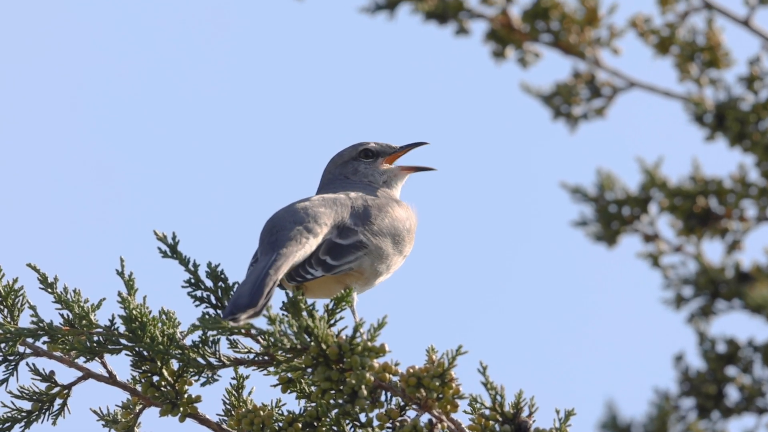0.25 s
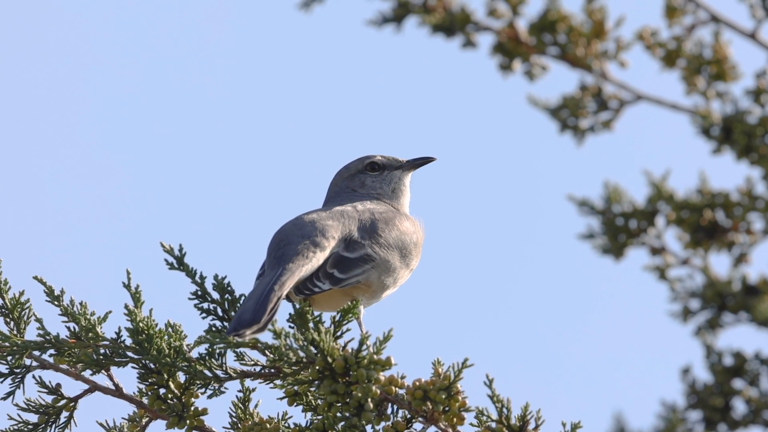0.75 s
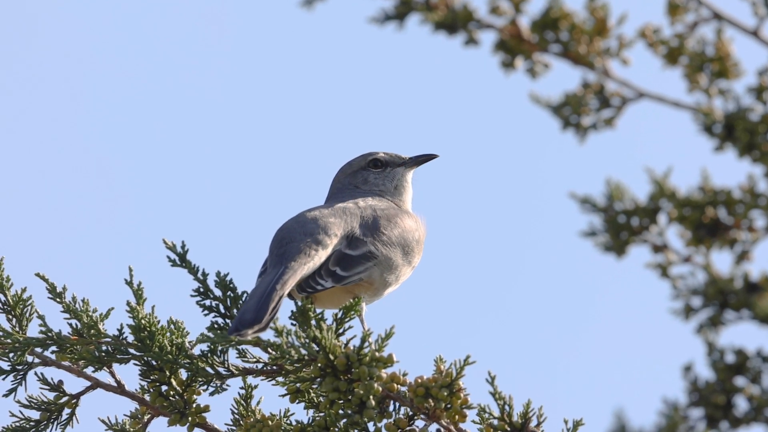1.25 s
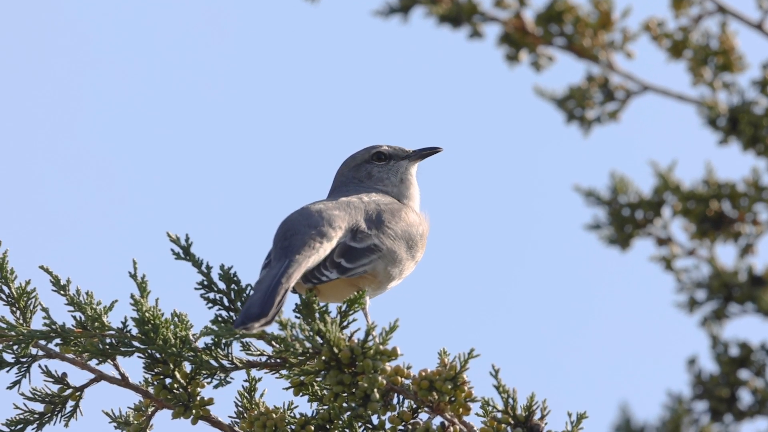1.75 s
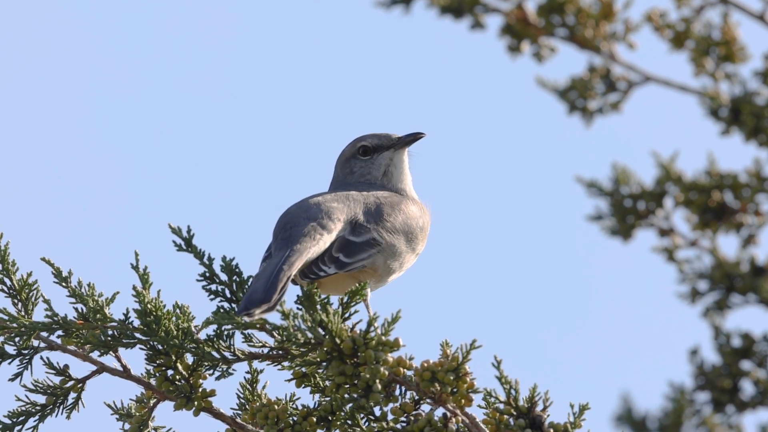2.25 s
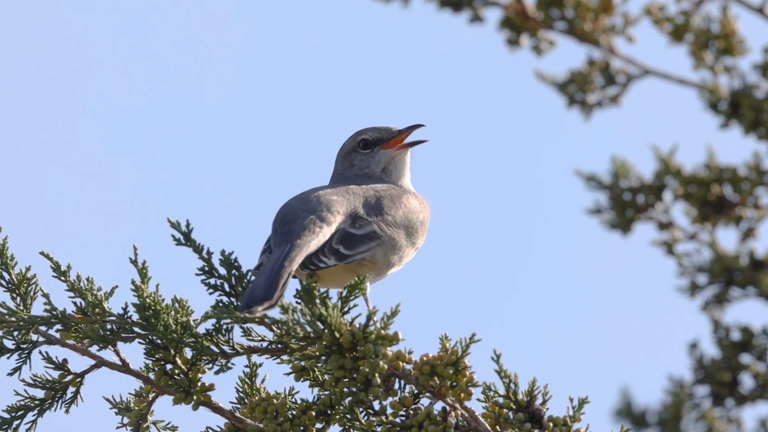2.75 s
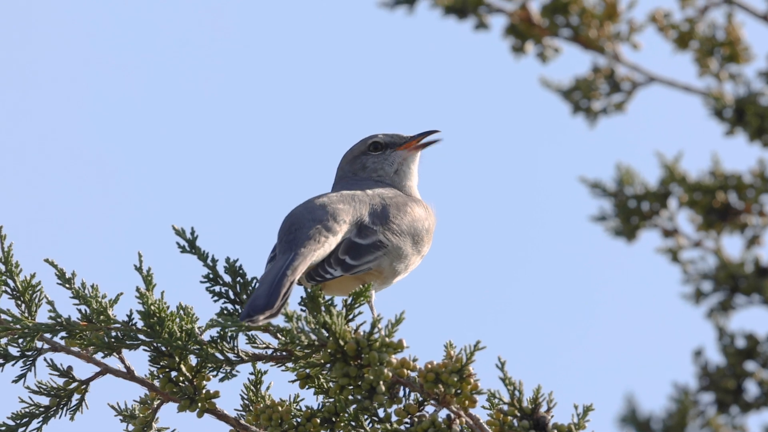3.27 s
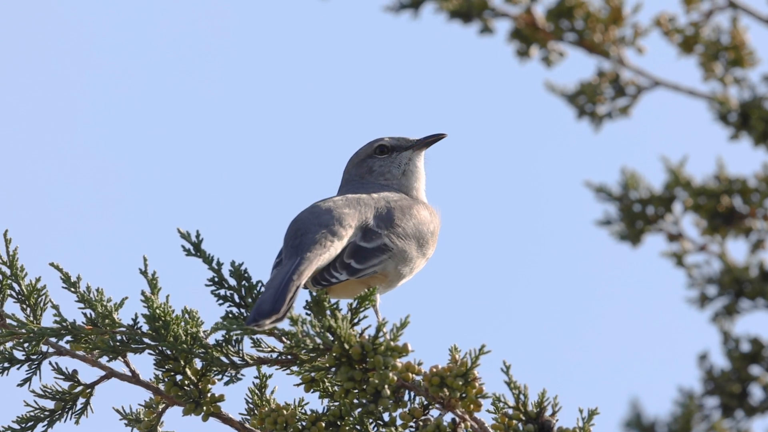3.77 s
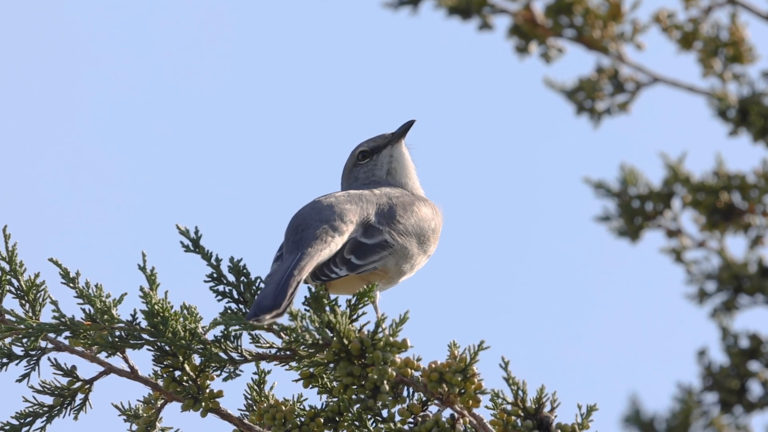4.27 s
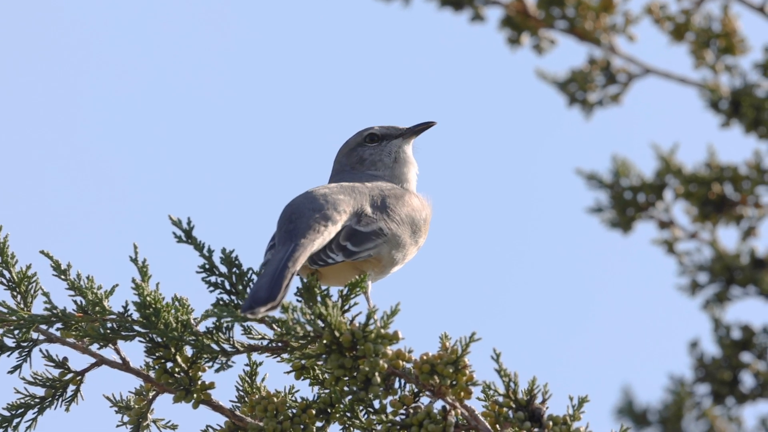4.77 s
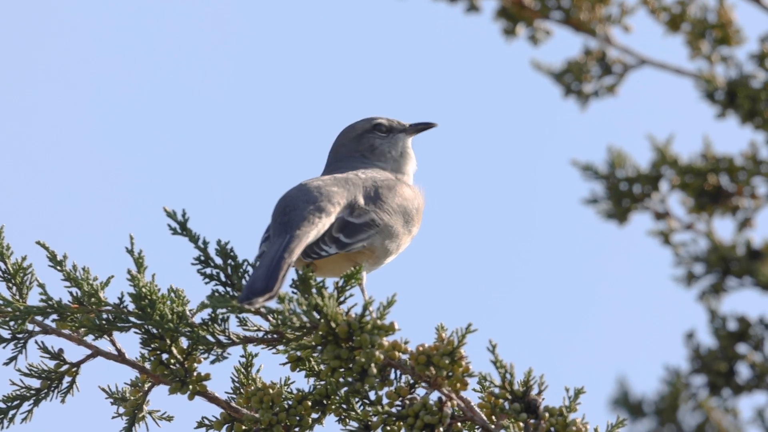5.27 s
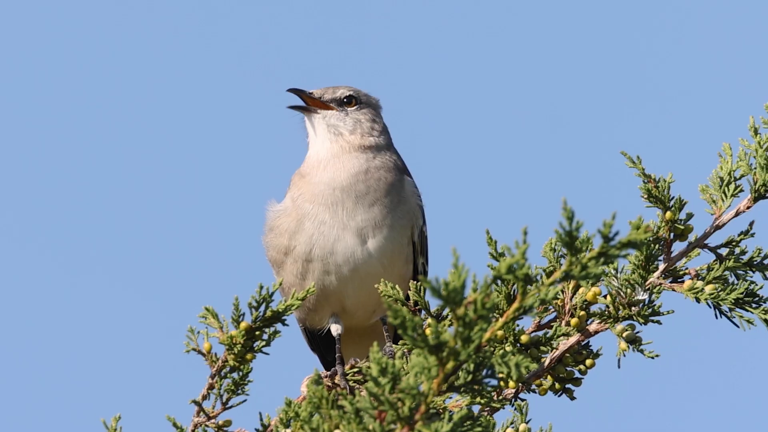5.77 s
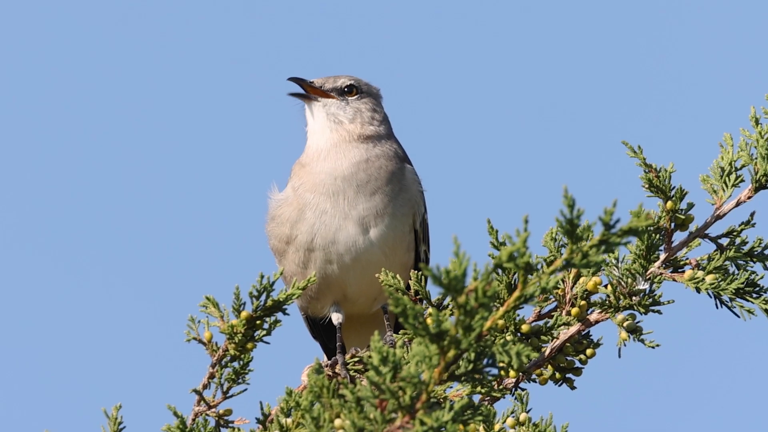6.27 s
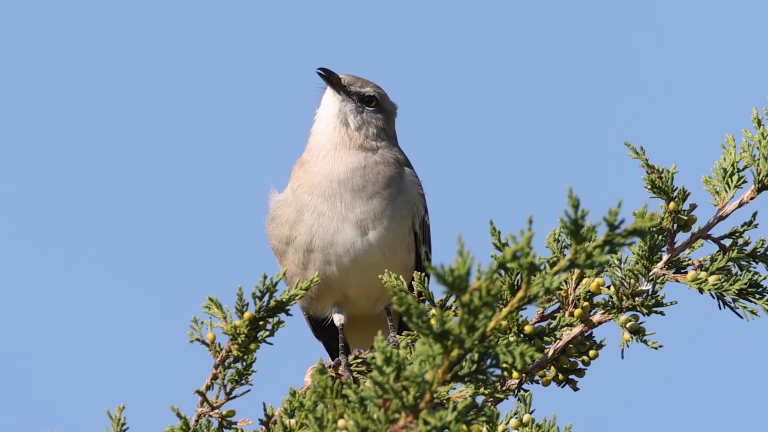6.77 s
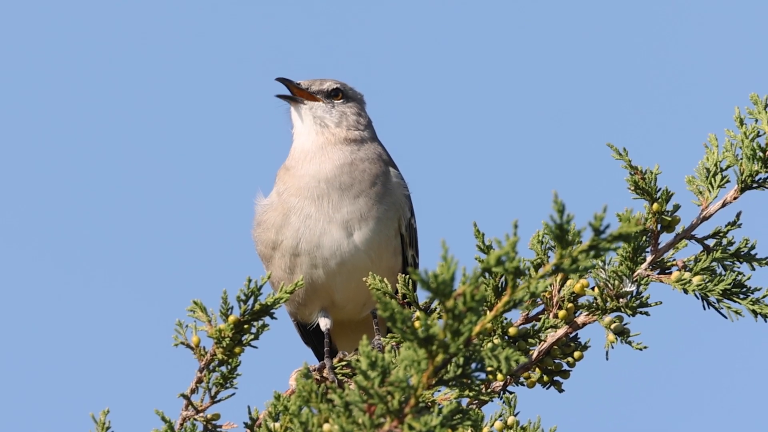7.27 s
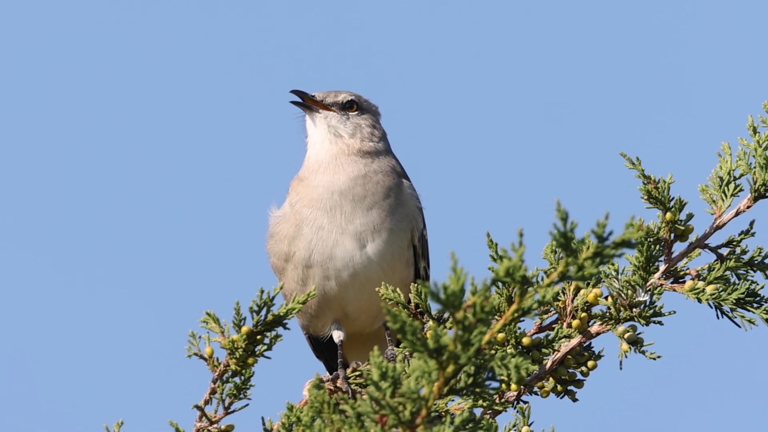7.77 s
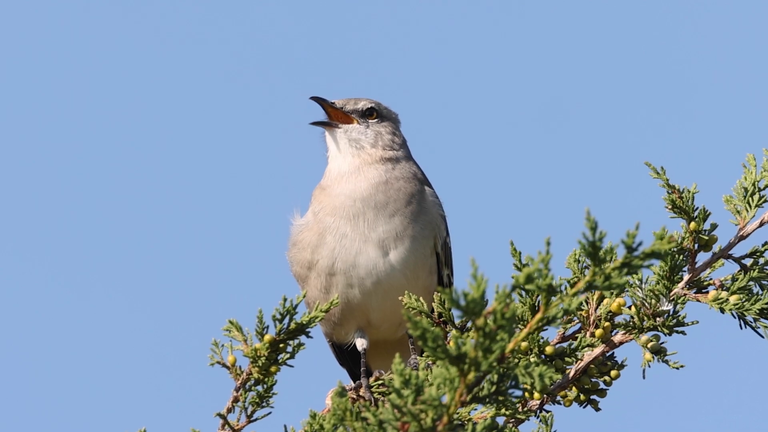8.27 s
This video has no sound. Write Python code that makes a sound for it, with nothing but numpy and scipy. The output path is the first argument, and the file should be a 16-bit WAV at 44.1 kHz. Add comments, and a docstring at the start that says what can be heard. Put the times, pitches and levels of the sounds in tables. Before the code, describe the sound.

A mockingbird sings close by outdoors: nasal calls, slurred whistles, a quick trill, raspy chips and a closing chatter over faint throbbing insects and low rumble.

```python
"""First comes a nasal, two-voiced call: a mockingbird sings close by, with two voices that modulate each other.
Slurred whistles, strained arches, a quick trill, hooks with yelps, rasps, rising chips and a chatter follow.
Its notes are near sines with chosen overtones; the rasps are shaped noise. Faint far whistles are near sines too.
Behind them, insects throb as pulsed narrow hiss, a cricket chirps, and a low rumble is filtered noise.
Part-way through, the rumble drops, the cricket stops and the insect chorus changes its balance."""
import sys
import numpy as np
from scipy import signal
from scipy.fft import rfft, irfft, next_fast_len
from scipy.io import wavfile
from scipy.ndimage import uniform_filter1d

SR = 44100
rng = np.random.default_rng(int(sys.argv[2]) if len(sys.argv) > 2 else 0)


def to_wav(s):
    """Save 16-bit WAV."""
    ch = np.atleast_2d(s).T  # columns
    pcm = np.round(np.clip(ch, -1, 1) * 32767)  # PCM
    wavfile.write(sys.argv[1], SR, pcm.astype(np.int16))


N = 375732
TIME = np.arange(N) / SR   # seconds
PROGRESS = np.linspace(0, 1, 101)   # from the start of a note to its end


def from_db(db):
    """Turn decibels into a plain gain."""
    return 10 ** (np.asarray(db) / 20)


def rms_one(x):
    """Scale a signal to an rms level of 1."""
    return x / np.sqrt(np.mean(np.abs(x) ** 2) + 1e-20)


def turns(hz):
    """Add up a changing frequency into a phase in radians."""
    return 2 * np.pi * np.cumsum(hz) / SR


def gain_at(spectrum, hz):
    """Gain of a (Hz, dB) table, joined on a log-frequency axis."""
    points_hz, db = np.transpose(spectrum)
    return from_db(np.interp(np.log(hz + 1), np.log(points_hz), db))


def coloured_noise(spectrum):
    """Noise with the given spectrum, rms 1."""
    size = next_fast_len(N)
    white = rfft(rng.standard_normal(size))
    gain = gain_at(spectrum, np.fft.rfftfreq(size, 1 / SR))
    return rms_one(irfft(white * gain, size)[:N])


def wander(rate_hz):
    """Random motion up to about the given rate, rms 1."""
    lowpass = signal.butter(2, rate_hz, fs=SR, output="sos")
    settled = signal.sosfilt(lowpass, rng.standard_normal(N + SR))[SR:]
    return rms_one(settled)


def stretches(rows):
    """A control that takes each row's value from its start to its end, with soft edges."""
    steps = sum(value * ((TIME > start) & (TIME < end)) for start, end, value in rows)
    return uniform_filter1d(steps * 1., SR // 100)


def hump(top_at, rise, fall, flatness):
    """Over a note: climbs by rise to zero at top_at, then sinks by fall; flatness 1 is a point, 2 a dome."""
    top_at = np.clip(top_at, .02, .98)
    away = np.interp(PROGRESS, [0, top_at, 1], [1, 0, 1])
    return -np.where(PROGRESS < top_at, rise, fall) * away ** flatness


def gesture(start, length, hz, db):
    """One note as rows of (seconds, Hz, dB)."""
    return np.transpose(np.broadcast_arrays(start + length * PROGRESS, hz, db))


def arched_notes(rows, rise, fall, edge_db, flatness, level_flatness, loud_lag=0):
    """Pitch and loudness each rise and fall with the air pressure; loudness may peak later."""
    arches = []
    for start, length, top_hz, top_at, peak_db in rows:
        hz = top_hz * (1 + hump(top_at, rise, fall, flatness))
        db = peak_db + hump(top_at + loud_lag, edge_db, edge_db, level_flatness)
        arches.append(gesture(start, length, hz, db))
    return arches


def notes(table, bend_hz, shake):
    """Yield each note's samples, pitch, loudness and phase; shake jolts both loudness and phase."""
    for note in table:
        s, hz, db = np.transpose(note)
        at = np.flatnonzero((TIME >= s.min() - .002) & (TIME <= s.max() + .002))
        fade = np.clip(np.minimum(at - at[0], at[-1] - at) / (.003 * SR), 0, 1)
        pitch = np.interp(TIME[at], s, hz) + bend_hz[at]
        loudness = np.interp(TIME[at], s, from_db(db)) * np.sin(fade * np.pi / 2) ** 2
        yield at, pitch, loudness * (1 + shake[at].real), turns(pitch) + shake[at].imag


def tones(table, partials, bend_hz, shake):
    """A voice sings a main tone with weaker partials tied to its pitch."""
    out = np.zeros(N)
    for at, pitch, loudness, phase in notes(table, bend_hz, shake):
        wave = sum(from_db(db) * np.sin(multiple * phase) for multiple, db in partials)
        out[at] += loudness * wave
    return out


# Rough stretches, where the bird's voice organ (the syrinx) vibrates irregularly.
# Each row: start in seconds, end in seconds, roughness from 0 to 1.
ROUGH_STRETCHES = [(1.09, 1.15, .14), (1.525, 1.56, .4), (2.515, 2.56, 0.22), (2.95, 3.09, 0.29),
                   (3.39, 3.425, 0.3), (3.6, 3.76, 0.14), (4.135, 4.28, 0.32), (6.1, 6.21, 0.34),
                   (8.13, 8.21, 0.27), (8.37, 8.52, .3)]
# Fast pitch warbles. Each row: start in seconds, end in seconds, depth in Hz.
PITCH_WARBLES = [(1.99, 2.19, 45), (2.52, 2.59, 80), (3.735, 3.81, 148)]
# Tone mixes. Each row: multiple of the note's pitch, gain in dB.
# The arches repeat at a quarter of the main pitch, so their multiples go in quarters.
ARCH_MIX = [(1 / 2, -11.5), (3 / 4, -15.5), (1, 0), (5 / 4, -18.5), (3 / 2, -19.5), (5 / 2, -33),
            (7 / 2, -41)]
WHISTLE_MIX = [(1, 1), (2, -32)]
CHIP_MIX = [(1, 7), (2, -19), (3, -26)]


def mockingbird():
    """All note types share one unsteady syrinx, so they share its bends, jolts and roughness."""
    warble_hz = 80
    bend_hz = stretches(PITCH_WARBLES) * np.sin(2 * np.pi * warble_hz * TIME) + 22 * wander(110)
    # the real part shakes loudness, the imaginary part shakes phase
    jolts = (wander(680) + 1j * wander(470)) / np.sqrt(2)
    roughness = stretches(ROUGH_STRETCHES)
    shake = roughness * jolts + .16 * wander(61)
    # strained arches break into beads, some fifty a second, that rise and fall in pitch and loudness
    beads = roughness * np.sin(turns(52 + 16 * wander(30)))

    nasal = nasal_calls(bend_hz, shake + .22 * jolts, slip_hz=60, coupling_db=-4)
    arches = tones(arch_notes(), ARCH_MIX, bend_hz + 330 * beads, shake + 1.2 * beads + .13 * jolts)
    whistle_notes = [*slur_notes(), buzz_note(), *hook_notes(), *yelp_notes()]
    whistles = tones(whistle_notes, WHISTLE_MIX, bend_hz, .7 * shake + .04 * jolts)
    trill = tones(trill_notes(half_s=.008, fall_hz=287), WHISTLE_MIX, bend_hz, shake + .23 * jolts)
    chips = tones(chip_notes(), CHIP_MIX, bend_hz, shake + .39 * jolts)
    return nasal + arches + whistles + trill + chips + rasps(grain=.067, swell_db=3)


# How the throat and open beak colour the overtones of nasal calls. Each row: frequency in Hz, gain in dB.
THROAT_COLOUR = [(1500, -8), (3200, 3.5), (4000, 6.5), (5750, -0.5), (6500, -21), (9000, -18), (10500, -45),
                 (13000, -25), (16000, -54)]


def nasal_calls(bend_hz, shake, slip_hz, coupling_db):
    """The second side sings about a fifth below the first; the two modulate each other into a stack of lines."""
    out = np.zeros(N)
    slip = turns(slip_hz * wander(12))   # the second side drifts against the first
    for at, pitch, loudness, phase in notes(nasal_notes(), bend_hz, shake):
        # overtones bloom as the beak opens, and the voice gets purer at the top of its range
        opening = np.sqrt(np.abs(np.sin(np.linspace(0, np.pi, len(at)))))
        bloom = opening * np.minimum(2450 / pitch, 1) ** 2
        # in brief notes the beak stays half shut, which lowers the throat's resonances
        shut = 1 + .16 * max(1 - len(at) / SR / .14, 0)
        for k in range(2, 20):
            multiple = k / 3
            second_order = -k % 3   # how strongly this line follows the second side's drift
            hz = multiple * pitch
            gain = 1
            if multiple != 1:
                coupling = from_db(coupling_db * second_order)
                gain = bloom * gain_at(THROAT_COLOUR, hz * shut) * coupling * (hz < SR / 2)
            dispersion = k * k   # the throat delays each line differently
            out[at] += loudness * gain * np.sin(multiple * phase + second_order * slip[at] + dispersion)
    return out


# Nasal calls. Each row: start in seconds, length in seconds, top pitch in Hz,
# place of the top from 0 to 1, peak level of the main tone in dB before the shaking.
CALLS = [(0.0, .052, 2100, .25, -31.5), (0.272, .192, 2430, .43, -30.3), (0.612, .138, 2400, .43, -30),
         (0.985, .163, 2150, .3, -32), (4.246, .04, 2700, .1, -26), (7.938, .044, 2600, .5, -34.5)]
# Closing chatter. Each row: start in seconds, length in seconds, top pitch in Hz,
# peak level of the main tone in dB before the shaking.
CHATTER_NOTES = [(8.299, .036, 3200, -24.5), (8.345, .034, 3330, -21.5), (8.396, .028, 2850, -27),
                 (8.443, .028, 3050, -25), (8.489, .033, 2880, -25.5)]


def nasal_notes():
    """Air pressure makes broad pitch arches for the calls, short steep ones for the chatter."""
    # rise, fall and loud_lag are shares: of the top pitch, and of the note's length
    calls = arched_notes(CALLS, rise=.16, fall=.28, edge_db=7, flatness=1.9, level_flatness=4, loud_lag=.3)
    top_at = .42
    chatter = [(start, length, hz, top_at, db) for start, length, hz, db in CHATTER_NOTES]
    return calls + arched_notes(chatter, rise=.34, fall=.34, edge_db=11, flatness=1.3, level_flatness=1.6)


# Three long strained arches, each a list of points.
# Each row: time in seconds, pitch of the main tone in Hz, rms level of the main tone in dB before the shaking.
STRAINED_ARCHES = [
    [(2.845, 2541, -34), (2.861, 3120, -26), (2.881, 2837, -25), (2.899, 3258, -24), (2.977, 3400, -29),
     (3.007, 3118, -26), (3.017, 3345, -28), (3.049, 3425, -30), (3.08, 3226, -34)],
    [(3.402, 3008, -35), (3.418, 3067, -25), (3.47, 3491, -28), (3.49, 3580, -29), (3.6, 3315, -26),
     (3.69, 2743, -28), (3.716, 2952, -30), (3.73, 2940, -32)],
    [(4.005, 2345, -34), (4.023, 3161, -29), (4.079, 3515, -26), (4.131, 3516, -29), (4.139, 3150, -25),
     (4.155, 3343, -27), (4.169, 3036, -30), (4.211, 3745, -22), (4.215, 3633, -28)],
]
# Soft arches, one between the chips and one after them, before the chatter.
# Each row: start in seconds, length in seconds, top pitch in Hz,
# place of the top from 0 to 1, peak level of the main tone in dB before the shaking.
SOFT_ARCH_NOTES = [(6.1, .105, 3350, .44, -38), (8.135, .072, 3350, .26, -39.5)]


def arch_notes():
    """The long strained arches follow drawn pitch curves; the soft ones are simple humps."""
    crest_db = 2.5   # peak over rms
    strained = [np.array(arch) + [0, 0, crest_db] for arch in STRAINED_ARCHES]
    return strained + arched_notes(SOFT_ARCH_NOTES, rise=.28, fall=.28, edge_db=8,
                                   flatness=1.1, level_flatness=1.5)


# Slurred whistles. Each row: start of the slur in seconds, length in seconds, top pitch in Hz, end pitch in Hz,
# curvature, loudest place from 0 to 1, peak level in dB, flick pitch in Hz, low note pitch in Hz,
# low note level in dB. Levels are before the whistle mix.
SLUR_NOTES = [(1.535, .177, 2380, 1720, 1.9, .18, -20.5, 1980, 1560, -31),
              (1.973, .223, 2320, 1750, 1.4, .46, -20, 2100, 1570, -28.5),
              (2.524, .178, 2380, 1680, 1.15, .34, -14.5, 1940, 1610, -27.5)]
FLICK_LEAD_S, FLICK_S, FLICK_RISE_HZ = .091, .028, 520   # the flick is centred this long before the slur
FLICK_DB = -4.5   # relative to the slur's peak
LOW_NOTE_S, LOW_NOTE_SAG_HZ = .085, 70


def slur_notes():
    """An upward flick, a held low note, and a slur that falls fast at first and then settles."""
    for s, length, top_hz, end_hz, curvature, loudest_at, db, flick_hz, low_hz, low_db in SLUR_NOTES:
        rising_hz = flick_hz + FLICK_RISE_HZ * (PROGRESS - .5)
        flick_level_db = db + FLICK_DB + hump(.62, 15, 7, 1.5)
        yield gesture(s - FLICK_LEAD_S - FLICK_S / 2, FLICK_S, rising_hz, flick_level_db)

        # the low note sags in the middle
        sagging_hz = low_hz - hump(.6, LOW_NOTE_SAG_HZ, LOW_NOTE_SAG_HZ / 2, 2)
        yield gesture(s - LOW_NOTE_S, LOW_NOTE_S, sagging_hz, low_db)

        falling_hz = end_hz + (top_hz - end_hz) * (1 - PROGRESS) ** curvature
        yield gesture(s, length, falling_hz, db + hump(loudest_at, 9, 13, 1.4))


# The buzzy whistle that ends the second arch.
# The single row: start in seconds, length in seconds, pitch in Hz, peak level in dB before the whistle mix.
BUZZ_NOTE = (3.662, .141, 2180, -14)


def buzz_note():
    """A whistle on a level base pitch that swells and fades."""
    start, length, hz, db = BUZZ_NOTE
    edge_db = 15
    return gesture(start, length, hz, db + hump(.52, edge_db, edge_db * .75, 1.4))


# Falling pips, in a trill or singly.
# Each row: centre in seconds, centre pitch in Hz, peak level in dB before the whistle mix.
PIPS = [(3.091, 2790, -18), (3.109, 2640, -13.5), (3.129, 2556, -16), (3.149, 2460, -13.5),
        (3.17, 2373, -15), (3.187, 2320, -16), (3.202, 2370, -24.5), (4.227, 4000, -20), (4.244, 3300, -15),
        (6.283, 3200, -31), (7.131, 3950, -37)]


def trill_notes(half_s, fall_hz):
    """Each pip swells and fades while its pitch drops."""
    # place from the centre in half lengths, level in dB
    shape = [(-1, -16), (-1 / 2, -1), (1 / 3, 0), (1, -18)]
    return [[(s + u * half_s, hz - u * fall_hz, db + swell_db) for u, swell_db in shape]
            for s, hz, db in PIPS]


# Hooks, which plunge onto a held note. Each row: start in seconds, length in seconds, held pitch in Hz,
# plunge time constant in seconds, plunge level in dB, held level in dB. Levels are before the whistle mix.
HOOK_NOTES = [(4.603, .088, 1845, .004, -13.5, -20), (4.854, .076, 1800, .0048, -13.5, -24.5),
              (5.073, .105, 1885, .005, -11.5, -18.5), (5.329, .083, 1905, .007, -10, -20)]
HOOK_TOP_HZ, HOOK_LOUDEST_HZ, HOOK_LOUD_WIDTH_HZ = 3700, 2350, 480
HOOK_SAG_HZ, HOOK_EDGE_DB = 70, 7   # the held note is flatter at its weak ends


def hook_notes():
    """The pitch drops exponentially, flares as it crosses the throat resonance, then holds."""
    for start, length, held_hz, plunge_s, plunge_db, held_db in HOOK_NOTES:
        plunge_hz = (HOOK_TOP_HZ - held_hz) * np.exp(-length * PROGRESS / plunge_s)
        hz = held_hz + hump(.54, HOOK_SAG_HZ, HOOK_SAG_HZ, 2) + plunge_hz
        # the resonance is wider on its upper side
        width_hz = HOOK_LOUD_WIDTH_HZ * np.where(hz > HOOK_LOUDEST_HZ, 1.7, .6)
        flare = from_db(plunge_db) * np.exp(-((hz - HOOK_LOUDEST_HZ) / width_hz) ** 2)
        held = from_db(held_db + hump(.52, HOOK_EDGE_DB, HOOK_EDGE_DB, 1.9))
        yield gesture(start, length, hz, 20 * np.log10(np.maximum(flare, held)))


# Yelps, one after each hook. Each row: start in seconds, length in seconds, top pitch in Hz,
# final pitch in Hz, flatness of the top, peak level in dB before the whistle mix.
YELP_NOTES = [(4.71, .045, 2560, 2500, 2.6, -11), (4.944, .051, 2800, 1800, 1.1, -13.3),
              (5.186, .039, 2460, 2100, 2.2, -8.3), (5.435, .04, 2090, 1700, 1.2, -12.5)]


def yelp_notes():
    """A quick, loud leap up from the foot pitch, and a drop to the final one."""
    foot_hz, top_at, edge_db = 1750, .49, 17
    for start, length, top_hz, final_hz, flatness, peak_db in YELP_NOTES:
        hz = top_hz + hump(top_at, top_hz - foot_hz, top_hz - final_hz, flatness)
        yield gesture(start, length, hz, peak_db + hump(top_at, edge_db, edge_db, 2.1))


# Toneless rasps. Each row: start in seconds, end in seconds, rms level in dB at the middle of the swell.
RASP_STRETCHES = [(0.964, 1.02, -39.5), (2.516, 2.555, -38), (3.63, 3.665, -27.5), (5.9, 5.945, -38),
                  (6.232, 6.272, -36), (6.276, 6.306, -29.5), (6.604, 6.665, -36.5), (6.98, 7.1, -34.5),
                  (7.387, 7.468, -34.5), (7.729, 7.815, -38.5), (7.938, 7.98, -39), (7.986, 8.025, -30.5)]


def rasps(grain, swell_db):
    """Chaotic vibration of the syrinx, heard through the throat resonance; pressure builds during each rasp."""
    noise = coloured_noise([(1000, -26), (1800, -17), (2600, -.5), (4400, -10), (6500, -24), (15000, -42)])
    swelling = []
    for start, end, db in RASP_STRETCHES:
        level_db = db + swell_db * np.interp(TIME, [start, end], [-.5, .5])
        swelling.append((start, end, from_db(level_db)))
    return stretches(swelling) * rms_one(noise * (1 + grain * wander(300)))


# Chips: one side of the syrinx sweeps straight up, the other follows and levels off.
# Each row: centre of the sweep in seconds, its peak level in dB, lag of the follower in seconds,
# follower's final pitch in Hz, its fading time in seconds, its peak level in dB.
# Levels are before the chip mix.
CHIP_NOTES = [(5.937, -27.5, -.002, 2950, .014, -29.5), (5.987, -33, .006, 5200, .009, -29),
              (6.257, -28.5, -.003, 2800, .015, -36), (6.295, -24, .009, 3950, .014, -30.5),
              (6.347, -25, .007, 4600, .014, -27), (6.668, -26, .008, 4300, .036, -30.5),
              (7.094, -21.3, .006, 4250, .032, -27), (7.149, -36, .003, 4900, .02, -31.5),
              (7.467, -21.5, .008, 4500, .018, -26), (7.812, -24, .006, 4500, .014, -27),
              (8.009, -23, .006, 4250, .016, -23.5), (8.056, -26.5, .007, 4900, .011, -28)]
SWEEP_S, SWEEP_RISE_HZ, SWEEP_MID_HZ = .021, 3500, 4020
FOLLOWER_FOOT_HZ, FOLLOWER_LEAD_S, FOLLOWER_RISE_S = 2150, .011, .0042


def chip_notes():
    """A straight upward sweep, overlapped by an S-shaped one from the other side of the syrinx."""
    for s, db, lag_s, final_hz, fade_s, follower_db in CHIP_NOTES:
        sweep_hz = SWEEP_MID_HZ + SWEEP_RISE_HZ * (PROGRESS - .5)
        yield gesture(s - SWEEP_S / 2, SWEEP_S, sweep_hz, db + hump(.48, 11, 18, 1.6))

        length = FOLLOWER_LEAD_S + fade_s
        risen = 1 / (1 + np.exp((FOLLOWER_LEAD_S - length * PROGRESS) / FOLLOWER_RISE_S))
        follower_hz = FOLLOWER_FOOT_HZ + (final_hz - FOLLOWER_FOOT_HZ) * risen
        level_db = follower_db + hump(1.2 * FOLLOWER_LEAD_S / length, 12, 12, 1.6)
        yield gesture(s + lag_s - FOLLOWER_LEAD_S, length, follower_hz, level_db)


def foliage(x, t60):
    """Trees scatter a dull tail of echoes, which falls by 60 dB in t60 seconds."""
    t = TIME[:SR]
    echoes = rng.standard_normal(SR) * from_db(-60 * t / t60) * (t > .004)
    dull = signal.butter(1, 4000, fs=SR, output="sos")
    echoes = signal.sosfilt(dull, echoes / np.linalg.norm(echoes))
    return signal.fftconvolve(x, echoes)[:N]


# Faint far whistles; the first may be an echo of the nasal call.
# Each row: start in seconds, length in seconds, top pitch in Hz,
# place of the top from 0 to 1, peak level in dB before the whistle mix.
FAR_NOTES = [(.775, .08, 2830, .15, -45), (5.77, .1, 2800, .15, -52), (7.55, .12, 1700, .45, -49)]


def far_whistles():
    """Faint, nearly level whistles with a small random wobble."""
    calls = arched_notes(FAR_NOTES, rise=.08, fall=.08, edge_db=7, flatness=1.5, level_flatness=1.8)
    return tones(calls, WHISTLE_MIX, 25 * wander(90), .3 * wander(70))


# Insect voices. Each row: pitch in Hz, width of the hiss in Hz, pulses per second,
# rms level in dB before the background changes, rms level in dB after it.
INSECT_VOICES = [(4550, 570, 68, -57.5, -53), (5975, 650, 39, -50.5, -45.5), (6510, 260, 57, -47, -51),
                 (7220, 500, 53.5, -51, -50.5), (8050, 500, 32, -56.5, -52), (8760, 110, 22, -77, -60.5)]


def insects(moved, fall_hz, unevenness):
    """Each wing stroke is a pulse of narrow hiss that sinks in pitch."""
    out = np.zeros(N)
    throb = .42   # depth of the pulsing, 0-1
    for hz, width_hz, per_s, first_db, second_db in INSECT_VOICES:
        stroke = np.cumsum(per_s + unevenness * wander(20)) / SR % 1
        phase = turns(hz + fall_hz * (.5 - stroke))
        hiss = wander(width_hz / 2) * np.cos(phase) + wander(width_hz / 2) * np.sin(phase)
        pulses = rms_one(hiss * (1 - throb * np.cos(2 * np.pi * stroke)))
        out += from_db(first_db + moved * (second_db - first_db)) * pulses
    return out


def cricket(hz, fall_hz, per_s):
    """Short falling chirps that come and go in irregular groups."""
    stroke = np.cumsum(per_s + 4 * wander(7.2)) / SR % 1
    groups = np.clip(.72 + wander(7.3), 0, 2)
    chirps = np.maximum(-np.cos(2 * np.pi * stroke), 0) * groups
    pitch = hz + fall_hz * (.5 - stroke) + 90 * wander(5.3)
    return rms_one(chirps * np.sin(turns(pitch)))


# Colour of the distant rumble. Each row: frequency in Hz, relative level in dB.
RUMBLE_COLOUR = [(20, -17), (70, 1), (155, -3.5), (240, -13.5), (600, -18.5), (1200, -20.5), (2200, -23),
                 (3600, -34), (10000, -47.5)]


def distant_rumble(moved):
    """Low-heavy noise that drops by 6.5 dB when the background changes."""
    return coloured_noise(RUMBLE_COLOUR) * from_db(-35.5 - 6.5 * moved)


def scene():
    """The bird close by with its echoes, far whistles, insects, rumble and a trace of steady hiss."""
    change_s = 5.66
    moved = np.clip((TIME - change_s) * 100, 0, 1)   # 0 before the background changes, 1 after
    bird = mockingbird()
    echo = from_db(-15) * foliage(bird, t60=.24)
    air = distant_rumble(moved) + from_db(-59) * rng.standard_normal(N)
    chirping = from_db(-55) * (1 - moved) * cricket(hz=4500, fall_hz=850, per_s=20)
    chorus = insects(moved, fall_hz=417, unevenness=4) + chirping
    return (bird + echo + far_whistles() + chorus + air)[None]


def record(dry):
    """A steep low-pass filter removes the top above 15750 Hz."""
    return signal.sosfilt(signal.ellip(12, .1, 80, 15750, fs=SR, output="sos"), dry)


dry = scene()
out = record(dry)
to_wav(out)
```